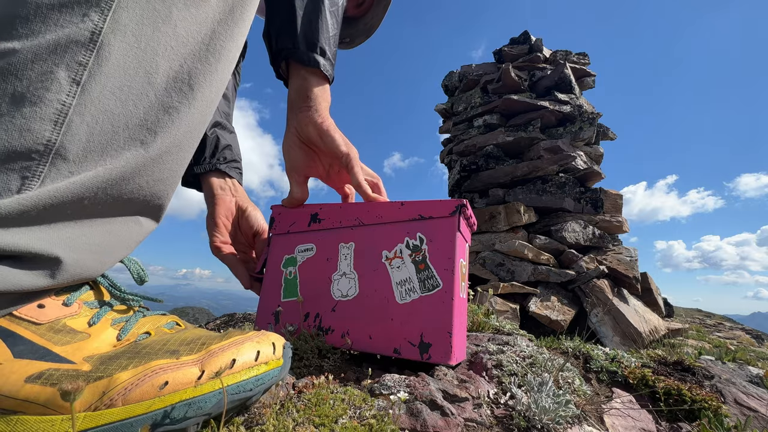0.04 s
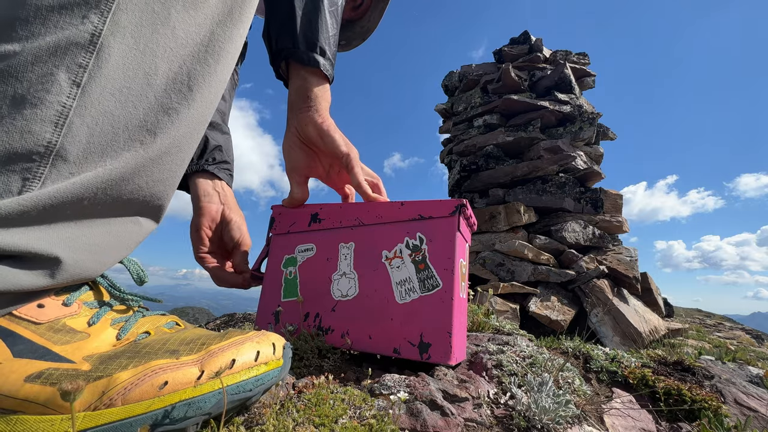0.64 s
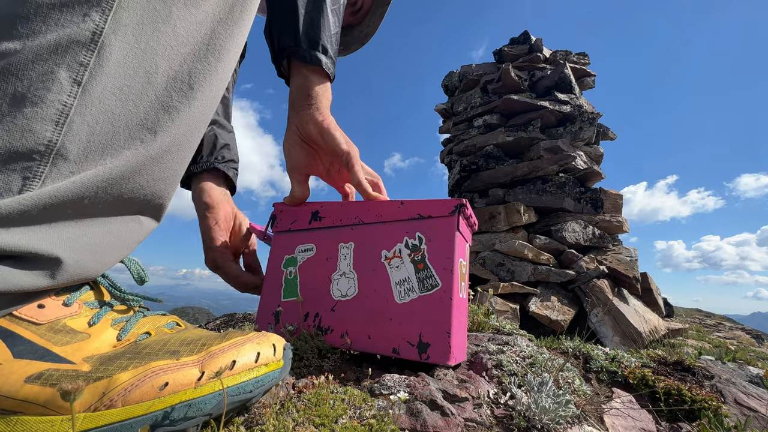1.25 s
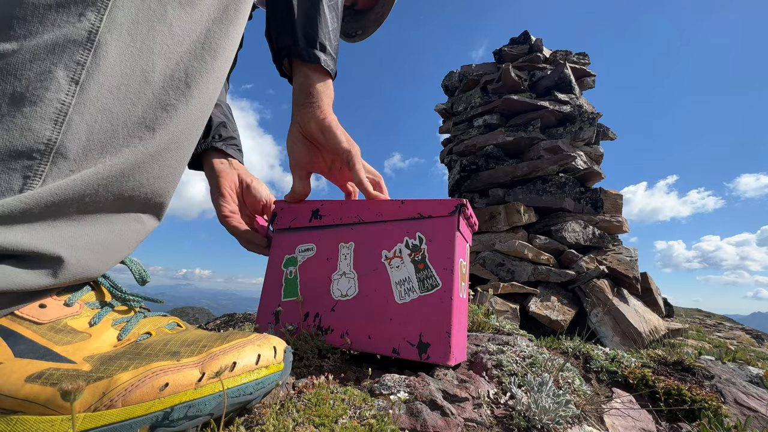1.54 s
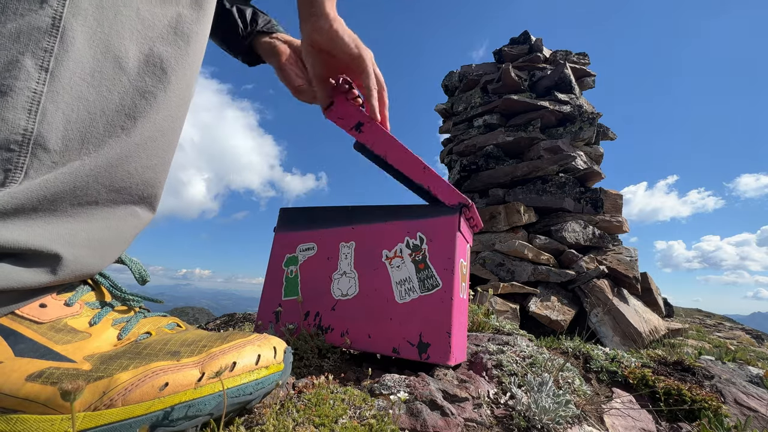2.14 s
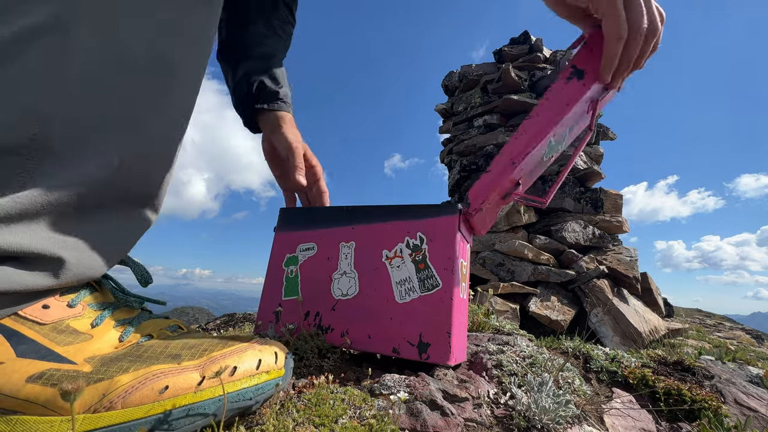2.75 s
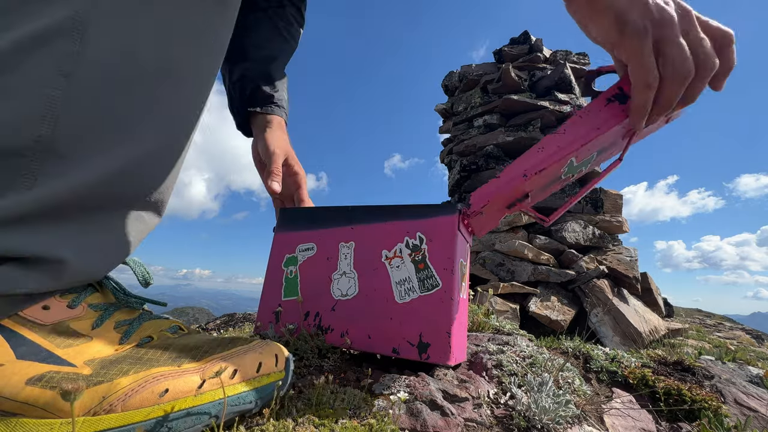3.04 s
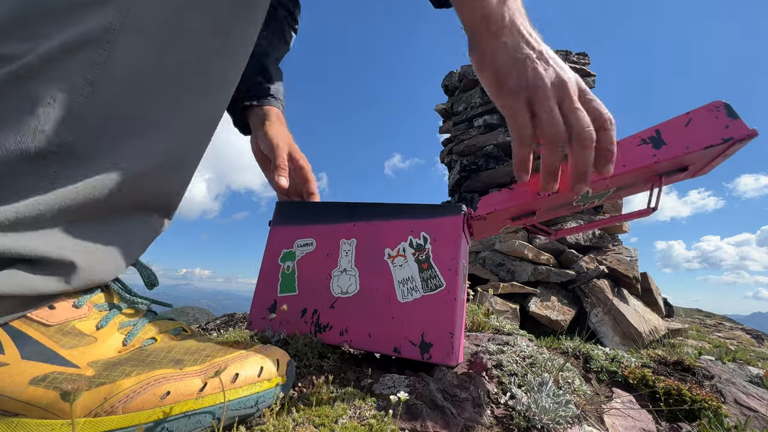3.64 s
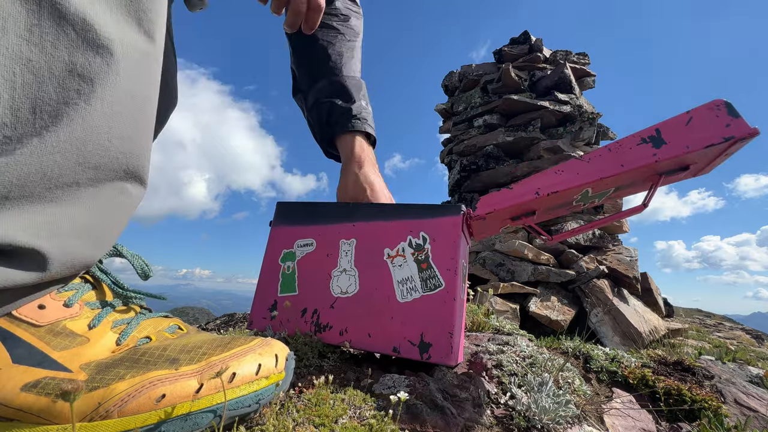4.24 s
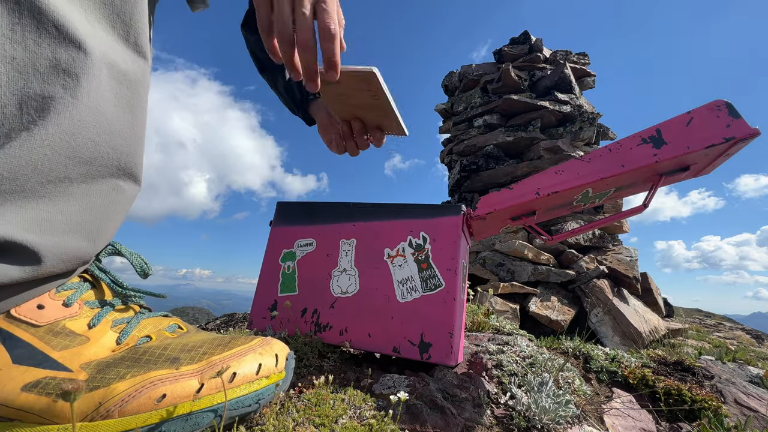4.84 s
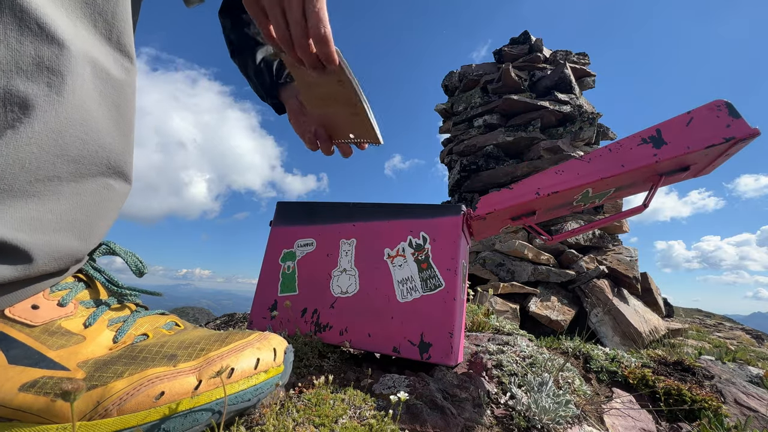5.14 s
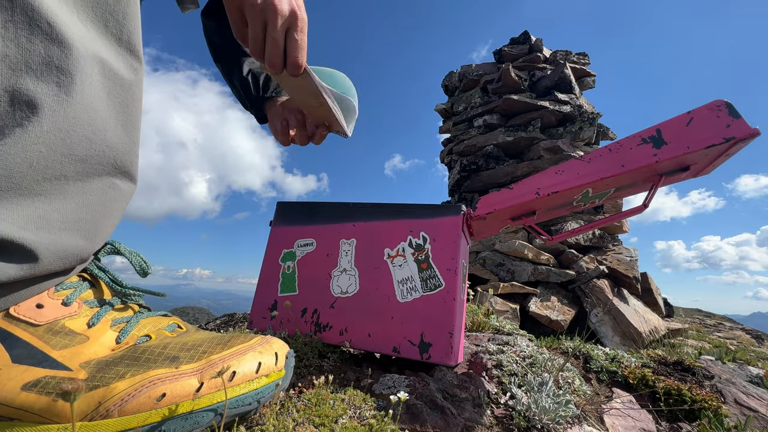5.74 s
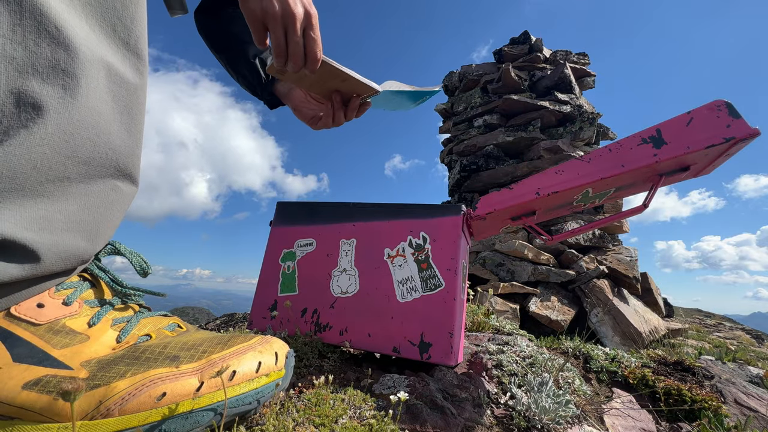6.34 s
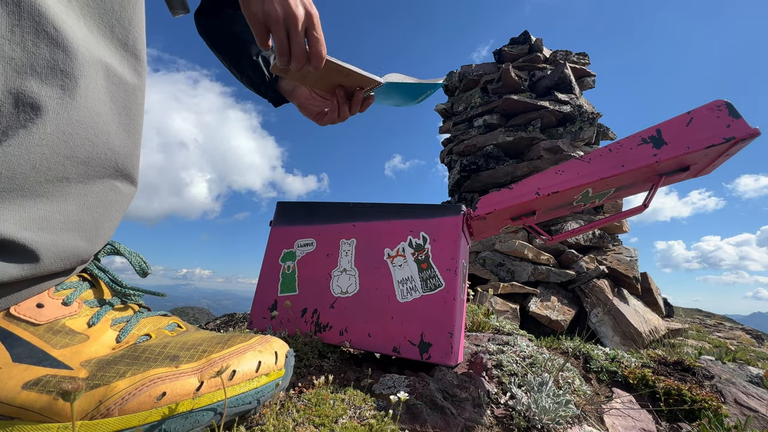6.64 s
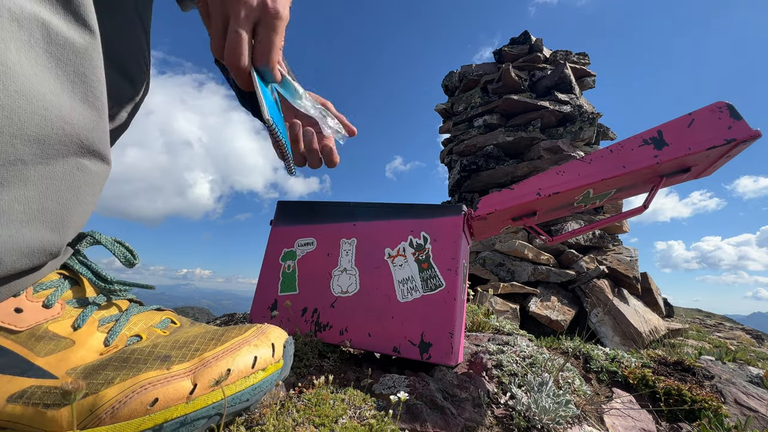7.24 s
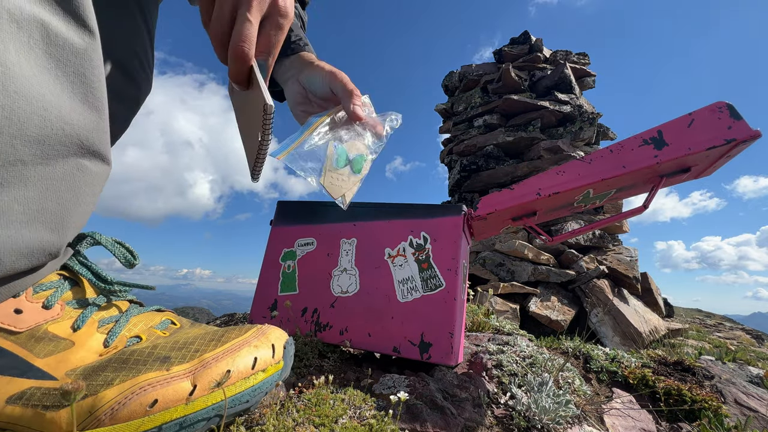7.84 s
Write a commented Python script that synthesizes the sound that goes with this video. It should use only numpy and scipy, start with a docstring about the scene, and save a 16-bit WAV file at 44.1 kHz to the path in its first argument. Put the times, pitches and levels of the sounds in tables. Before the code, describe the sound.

A metal box clanks, unlatches and rattles open close by, then notebook pages flick and a plastic bag crinkles in light wind.

```python
"""A steel ammunition can is opened close to the microphone, on a rocky summit. The latch lever's wire bail
drops against the wall, the latch snaps over, the hinge jerks and the lid rattles onto its stop: each blow is a
short crack, then clear modes ringing over a crowd of lesser plate modes. A notebook knocks the walls on its way
out and is leafed open; a small plastic bag crinkles. Both slide and buckle in grains of noise. Sleeves swish in
tiny slips over a light wind; a low drone swells late."""
import sys
import numpy as np
from scipy import signal
from scipy.fft import rfft, irfft, next_fast_len
from scipy.io import wavfile
from scipy.ndimage import uniform_filter1d

SR = 44100
rng = np.random.default_rng(int(sys.argv[2]) if len(sys.argv) > 2 else 0)


def wav_out(sig):
    """Save sig, one row per channel (or a flat mono array), as 16-bit PCM at SR to the path in sys.argv[1]."""
    wavfile.write(sys.argv[1], SR, np.round(np.clip(np.atleast_2d(sig).T, -1, 1) * 32767).astype(np.int16))


N = 347949
TIME = np.arange(N) / SR


def from_db(db):
    """Decibels to gain."""
    return 10 ** (np.asarray(db) / 20)


def rms_one(x):
    """Scale to unit power."""
    return x / np.sqrt(np.mean(x ** 2) + 1e-20)


def level(rows):
    """Gain curve from (time [s], level [dB]) rows; silent outside them."""
    return from_db(np.interp(TIME, *np.transpose(rows), left=-150, right=-150))


def at_hz(points, hz, axis=1):
    """Read a table column on a log-frequency axis."""
    table = np.array(points)
    return np.interp(np.log(np.maximum(hz, 1)), np.log(table[:, 0]), table[:, axis])


def add(out, start_s, sound):
    """Mix a sound in from start_s on."""
    start = max(0, round(start_s * SR))
    out[..., start:start + sound.shape[-1]] += sound[..., :N - start]


def fade(t, t60_s):
    """Exponential decay, 60 dB in t60_s."""
    return np.exp(-np.log(1000) * t / max(t60_s, 1e-3))


def drift(per_s):
    """Smooth random curve, unit RMS."""
    knots = rng.standard_normal(2000)
    return rms_one(np.interp(TIME * per_s, np.arange(len(knots)), knots))


def strokes(rows):
    """Gain curve of hand strokes: each swells and dies with its speed, in a near-Gaussian bell."""
    power = sum(from_db(db) ** 2 * np.exp(-2 * np.abs(2 * (TIME - centre_s) / length_s) ** 1.9)
                for centre_s, length_s, db in rows)
    return np.sqrt(power + 1e-16)


def grains(per_s, spread_db, t60_s):
    """Power envelope of tiny slips or buckles of unequal size; mean near 1."""
    sizes = from_db(spread_db * np.minimum(rng.exponential(1, N), 4)) ** 2
    impulses = sizes * (rng.random(N) < per_s / SR)
    power = signal.lfilter([1], [1, -fade(2 / SR, t60_s)], impulses + 1e-12)
    return power / (uniform_filter1d(power, SR // 8) + 1e-9)


# Microphone port pair: (frequency [Hz], coherence [0-1], left lead [rad])
MIC_PORTS = [(40, .05, 0), (70, .25, .1), (140, .9, .2), (300, .93, .45), (550, .92, .63), (1000, .7, 1.05),
             (2000, .45, 1.25), (4000, .55, .4), (8500, .5, 2.2), (12500, .87, .75), (16000, .7, 1)]

def noise(spectrum, size=N, band_hz=(10, 20000)):
    """Coloured noise at the two ports, not normalised."""
    length = next_fast_len(size, True)
    hz = np.arange(length // 2 + 1) * SR / length + 1e-3
    left, other = rfft(rng.standard_normal((2, length)))
    coherence = np.clip(at_hz(MIC_PORTS, hz), 0, .99)
    lag = np.exp(-1j * at_hz(MIC_PORTS, hz, axis=2))
    right = (coherence * left + np.sqrt(1 - coherence ** 2) * other) * lag
    passband = 1 / np.sqrt((1 + (band_hz[0] / hz) ** 12) * (1 + (hz / band_hz[1]) ** 12))
    return irfft(np.array([left, right]) * passband * from_db(at_hz(spectrum, hz)), length)[:, :size]


# Buffet, hiss and drone spectra: (frequency [Hz], density [dB])
WIND_SPECTRUM = [(15, -56), (25, -26), (57, -1.5), (102, -5.5), (146, -8.5), (220, -11), (305, -16),
                 (344, -17), (394, -16), (460, -23.5), (555, -37.5), (1500, -44.5), (1950, -77.5),
                 (3300, -120)]
AIR_SPECTRUM = [(470, -26.5), (800, -8), (1750, -5), (7620, -10), (8330, -2.5), (11000, -13.5), (13600, -5),
                (16500, -28.5)]
DRONE_SPECTRUM = [(60, -24), (110, -4), (145, 2), (180, 0.5), (230, -17.5), (400, -58)]
# Buffet and drone envelopes: (time [s], relative level [dB])
WIND_GUSTS = [(0, -54), (2.3, -52), (4.7, -53.5), (5.6, -53), (6.3, -54), (7.1, -62), (7.4, -56),
              (7.89, -55.5)]
DRONE_SWELL = [(6.3, -71), (6.7, -59.5), (7.13, -63.5), (7.19, -48), (7.35, -55), (7.89, -51)]

def wind(flutter_db=0.98):
    """Soft buffeting under a faint open-air hiss; a low drone swells and wavers."""
    buffet = rms_one(noise(WIND_SPECTRUM)) * level(WIND_GUSTS) * from_db(flutter_db * drift(14))
    drone = rms_one(noise(DRONE_SPECTRUM)) * level(DRONE_SWELL)
    hiss = rms_one(noise(AIR_SPECTRUM))
    return from_db(-1.5) * buffet + drone + from_db(-81.5) * hiss


def friction(spectrum, gain, per_s, spread_db):
    """Sliding surfaces: a hiss of dense small slips."""
    return rms_one(noise(spectrum)) * gain * np.sqrt(grains(per_s, spread_db, t60_s=0.091))


# Sliding nylon: (frequency [Hz], density [dB])
NYLON_SPECTRUM = [(410, -42), (700, -15), (1340, -1.5), (2100, -4), (2330, -9), (6280, -3.5), (7560, -8.5),
                  (8980, -1), (10500, -7), (12500, -1.5), (15700, -12.5), (16500, -24.5)]
# Arm strokes: (centre [s], length [s], level [dB])
SLEEVE_STROKES = [(1.15, 0.26, -57.5), (1.47, .1, -71), (1.68, 0.37, -59), (2.08, 0.18, -61),
                  (2.7, .24, -71.5), (2.97, 0.15, -68.5), (3.4, 0.53, -63.5), (3.89, 0.1, -53.5),
                  (3.99, .12, -54), (4.17, 0.14, -62.5), (4.35, 0.13, -54.5), (4.76, 0.26, -58.5)]

def sleeves(busy_s=(0.935, 5.0), idle_db=-75):
    """Nylon swishes with each stroke and stirs faintly between them while the arms work."""
    busy = uniform_filter1d(1.0 * (TIME > busy_s[0]) * (TIME < busy_s[1]), size=SR // 10)
    gain = np.hypot(strokes(SLEEVE_STROKES), from_db(idle_db) * busy)
    return friction(NYLON_SPECTRUM, gain, per_s=1900, spread_db=3.0)


def rustle(spectrum, moves, snaps, per_s, spread_db, smooth_share, snap_db, snap_t60_s):
    """A thin sheet slides and buckles; each buckle has its own colour, a few snap out loudly."""
    out, t = 0, np.arange(SR // 10) / SR
    bands = [noise(spectrum, band_hz=edges) for edges in [(200, 2500), (2500, 7000), (7000, 17000)]]
    shared_grains = grains(per_s, spread_db, t60_s=0.0078)
    effort = strokes(moves)
    for band in bands:
        crackle = .5 * (shared_grains + grains(per_s, spread_db, t60_s=0.0043))
        power = effort ** 2 * (smooth_share + (1 - smooth_share) * crackle)
        for start_s, db in snaps:
            snap = from_db(db + snap_db + rng.normal(0, 1.0)) * fade(t, snap_t60_s)
            add(power, start_s, snap ** 2)
        out = out + band * np.sqrt(power)
    return out / np.std(sum(bands))


# Plastic film: (frequency [Hz], density [dB])
PLASTIC_SPECTRUM = [(240, -3), (400, -4), (1150, -13.5), (2180, -2), (2980, -13), (4680, -8.5), (5300, -11),
                    (6390, -8), (8990, -4), (10800, -10.5), (14100, -9.5), (15700, -16.5), (16500, -36)]
# Squeezes: (centre [s], length [s], relative level [dB])
BAG_SQUEEZES = [(7.207, 0.078, -55), (7.28, 0.15, -63.5), (7.41, .05, -47), (7.468, 0.084, -40.5),
                (7.58, 0.19, -54.5), (7.759, 0.36, -69.5), (7.822, .022, -50)]
# Loud buckles: (time [s], relative peak [dB])
BAG_BUCKLES = [(7.1076, -60), (7.1672, -40.5), (7.186, -35.5), (7.2212, -33.5), (7.2807, -38.5),
               (7.3954, -35.5), (7.6348, -31), (7.6606, -42.5), (7.7499, -41.5), (7.816, -47)]

def bag():
    """Squeezed plastic crinkles densely, with short snaps."""
    return from_db(1.9) * rustle(PLASTIC_SPECTRUM, BAG_SQUEEZES, BAG_BUCKLES, per_s=700, spread_db=4,
                                 smooth_share=.25, snap_db=-6, snap_t60_s=.014)


# Paper: (frequency [Hz], density [dB])
PAPER_SPECTRUM = [(470, -2), (800, -13.5), (1890, 2.5), (4650, -5.5), (5410, -4.5), (6710, -4.5),
                  (7720, -2.5), (9570, -1.5), (10900, -5), (14200, -0.5), (16500, -20)]
# Sliding pages: (centre [s], length [s], relative level [dB])
PAGE_SLIDES = [(5.391, .18, -55.5), (5.399, 0.029, -50), (5.58, 0.24, -68), (5.719, 0.011, -43.5),
               (5.747, 0.083, -55), (5.95, 0.024, -46), (6.0, 0.12, -57.5), (6.22, 0.13, -79),
               (6.601, 0.072, -80), (6.8, 0.11, -77.5)]
# Page flicks: (time [s], relative peak [dB])
PAGE_SNAPS = [(5.369, -40.5), (5.3926, -27), (5.586, -45), (5.7138, -48), (5.7344, -30), (5.767, -33.5),
              (5.938, -54), (5.949, -33), (5.9864, -44), (6.0057, -39), (6.2297, -48.5), (6.567, -65.5),
              (6.622, -60.5)]

def notebook():
    """Leafed pages slide and flick."""
    return from_db(-3.0) * rustle(PAPER_SPECTRUM, PAGE_SLIDES, PAGE_SNAPS, per_s=300, spread_db=3.5,
                                  smooth_share=.3, snap_db=-7, snap_t60_s=.03)


# Pushes on the can: (centre [s], length [s], level [dB])
ROCKING_STROKES = [(1.17, .22, -46), (3.05, .7, -49)]

def rocking(flutter_db=1.5):
    """The can rocks on the ground: a rumble as dull as the wind."""
    return rms_one(noise(WIND_SPECTRUM)) * strokes(ROCKING_STROKES) * from_db(flutter_db * drift(36))


# Rubbed steel: (frequency [Hz], density [dB])
RUB_SPECTRUM = [(150, -30), (250, -6.5), (507, -7), (710, -10.5), (1020, -21), (1840, -19), (2040, -24.5),
                (2370, -25), (4000, -36.5), (5200, -69.5), (8800, -120)]
# Rubs: (centre [s], length [s], level [dB])
RUB_STROKES = [(1.1, 0.31, -49), (1.85, 0.73, -57), (2.49, 0.55, -52), (3.07, 0.23, -53.5),
               (3.29, 0.39, -41), (3.47, 0.24, -42), (3.66, 0.32, -56), (4.22, 0.63, -57.5)]

def rubbing():
    """Steel or a hand slides on the can."""
    return friction(RUB_SPECTRUM, strokes(RUB_STROKES), per_s=160, spread_db=3.5)


def panned(db, pan_db):
    """Stereo gains, left pan_db above right."""
    return from_db(db + pan_db * np.array([[.5], [-.5]]))


def mode(t, hz, db, t60_s, pan_db):
    """One ringing mode; its strength varies at random with where the blow lands."""
    port_lag = np.array([[0], [at_hz(MIC_PORTS, hz, axis=2)]])
    phase = 2 * np.pi * (hz * t + rng.random()) - port_lag
    return panned(db + rng.normal(0, 1), pan_db) * np.sin(phase) * fade(t, t60_s)


def bunched(x, spacing_hz=90, spread_db=3.5):
    """A sheet's lesser modes bunch into narrow peaks and gaps."""
    length = next_fast_len(x.shape[-1], True)
    position = np.arange(length // 2 + 1) * SR / length / spacing_hz
    heights_db = rng.normal(0, spread_db, int(position[-1]) + 2)
    ripple = from_db(np.interp(position, np.arange(len(heights_db)), heights_db))
    return irfft(rfft(x, length) * ripple, length)


# Steel sheet registers (thud, body, clang, tick): (low edge [Hz], high edge [Hz])
SHEET_REGISTERS = [(50, 300), (300, 1100), (1100, 6000), (6000, 17000)]
# Decay per register: (base t60 [s], crack over ring [dB])
REGISTER_DECAY = [(0.089, -6), (0.13, -3), (0.12, 8), (0.078, 5.5)]
CRACK_T60_S = 0.0095
THUD_SLOPE, USUAL_BLOW_DB = 0.55, -35   # the ground holds the can, so the thud grows less than the body
CONTACT_SLOPE = -0.52   # dB of contact time per dB of hardness

def blows(rows, sheet, modes, thud_db, clang_db, clang_slope, contact_s, choke_t60_s, pan_db, ring_scale):
    """Struck steel: a crack, then modes over a noise crowd. Hardness is tick level over body level."""
    out, t = np.zeros((2, N)), np.arange(SR // 2) / SR
    gaps_s = np.diff([row[0] for row in rows], append=N / SR)
    for k, (low_hz, high_hz) in enumerate(SHEET_REGISTERS):
        crowd_t60_s, crack_db = REGISTER_DECAY[k]
        crowd = noise(sheet, size=N + len(t), band_hz=(low_hz, high_hz))
        crowd = rms_one(bunched(crowd) if k > 1 else crowd)
        for (start_s, body_db, hardness_db, ring_length), gap_s in zip(rows, gaps_s):
            levels_db = [thud_db + THUD_SLOPE * (body_db - USUAL_BLOW_DB), body_db,
                         body_db + clang_db + clang_slope * hardness_db, body_db + hardness_db]
            start = max(0, round(start_s * SR))
            sustain = ring_length * ring_scale[k]   # a gripping hand shortens the ring
            touch_s = contact_s * from_db(CONTACT_SLOPE * hardness_db)
            crack = from_db(crack_db) * fade(t, CRACK_T60_S + 2 * touch_s)
            ring = crowd[:, start:start + len(t)] * (fade(t, crowd_t60_s * sustain) + crack)
            ring += sum(mode(t, hz, db, t60_s * sustain, pan)
                        for hz, db, t60_s, pan in modes if low_hz <= hz < high_hz)
            ring *= 1 - np.exp(-(t / (touch_s + 0.83 / low_hz)) ** 2)   # low modes build up slower
            ring *= fade(np.maximum(t - gap_s, 0), choke_t60_s)   # the next contact damps the ring
            ring /= np.sqrt(np.mean(ring ** 2) * len(t) / (SR / 50))   # energy of 20 ms at unit power
            add(out, start_s, ring * panned(levels_db[k], pan_db[k]))
    return out


# Inside knocks: (time [s], body level [dB], hardness [dB], ring length [ratio])
INNER_BLOWS = [(4.1815, -38, -28, 0.26), (4.3655, -27, 0, 0.86)]
# Lesser plate modes: (frequency [Hz], density [dB])
INNER_CROWD = [(100, -25), (250, -20), (400, -5.5), (600, 1), (750, -2), (1200, 7), (1800, 5.5),
               (2800, 1.5), (5000, -8.5), (8000, -22.5), (12000, -23), (17000, -39)]
# Open can: (frequency [Hz], level over crowd [dB], base t60 [s], pan [dB])
OPEN_CAN_MODES = [(390, -5, .2, 2), (525, -5, .15, 2), (578, 6, .16, 1), (850, -4, .11, 8),
                  (925, -7, .2, 2), (1087, -9, .18, 0), (1240, -3, .14, 4), (1653, -11, .17, 0),
                  (2062, -10, .16, 0), (2126, -16, .2, 0), (2234, -15, .2, 0), (2616, -11, .16, 0),
                  (2794, -2, .1, -3), (3036, -9, .09, -2), (3967, -9, .08, 3)]

def contents():
    """The notebook knocks the walls of the open can on its way out."""
    return blows(INNER_BLOWS, INNER_CROWD, OPEN_CAN_MODES,
                 thud_db=-45.5, clang_db=-0.1, clang_slope=0.54, contact_s=0.0029, choke_t60_s=1.5,
                 pan_db=[0, 1, 0, 1], ring_scale=[1.6, 2.22, 2.05, 1.7])


# Bail drops: (time [s], body level [dB], hardness [dB], ring length [ratio])
BAIL_BLOWS = [(0, -36, -15.5, 0.62), (0.1425, -17, -11.5, 1), (0.401, -84, 17, 0.33),
              (0.5905, -25.5, -5.5, 0.71)]
# Lesser wall modes: (frequency [Hz], density [dB])
WALL_CROWD = [(100, -14), (250, -13.5), (400, 0), (650, 3), (900, -0.5), (1300, -4), (1600, -8), (2200, -6),
              (3000, -16.5), (4300, -7), (5800, -9), (9500, -17.5), (13500, -11.5), (17000, -19.5)]
# Shut can: (frequency [Hz], level over crowd [dB], base t60 [s], pan [dB])
SHUT_CAN_MODES = [(392, -3, .14, -2), (530, 6, .16, 0), (622, -3, .09, -3), (660, -2, .07, -6),
                  (817, 7, .15, 2), (905, -4, .13, 6), (937, 0, .22, 14), (1077, -8, .11, 8),
                  (1260, 0, .09, 0), (1335, -8, .19, 2), (1696, -11, .12, 0), (1814, -11, .1, 0),
                  (2083, -13, .09, 2)]

def bail():
    """The latch lever's wire bail drops against the wall and rings the shut can."""
    return blows(BAIL_BLOWS, WALL_CROWD, SHUT_CAN_MODES,
                 thud_db=-52.5, clang_db=-3.4, clang_slope=0.73, contact_s=.0005, choke_t60_s=.2,
                 pan_db=[-2, 0.5, 2.5, 0], ring_scale=[.43, 1.0, 0.93, 0.94])


# Catch snaps, lever moves: (time [s], body level [dB], hardness [dB], ring length [ratio])
CATCH_BLOWS = [(1.029, -46, -6.5, 0.73), (1.0432, -26.5, 1.5, 0.2)]
LEVER_BLOWS = [(0.945, -51.5, -25, 0.63), (1.066, -31.5, -17.5, 1.56), (1.1585, -20.5, -3.5, 1.11),
               (1.268, -35, -11.5, 0.68), (1.5, -47.5, -21, 1.2), (1.524, -51, -3, 1.9),
               (1.546, -45, -0.5, 1.2), (1.563, -39.5, -3.5, 0.98), (1.799, -47, -6.5, 1.5),
               (1.8245, -45.5, -0.5, 1.04)]
# Lesser plate modes: (frequency [Hz], density [dB])
LATCH_CROWD = [(100, -4.5), (170, -2), (290, -12), (380, -4), (780, -1.5), (1000, -6), (1400, -4.5),
               (2000, -4), (2800, -12), (4400, -6), (5400, -8.5), (10000, -12.5), (13000, -13.5),
               (17000, -25.5)]
# Catch, lever: (frequency [Hz], level over crowd [dB], base t60 [s], pan [dB])
CATCH_MODES = [(530, -2, .1, 0), (620, -2, .09, 0), (765, 3, .1, 1), (2240, -3, .06, -8), (3700, 0, .07, 8),
               (4000, 2, .07, 5), (4400, 7, .07, 5), (4560, 6, .07, 5), (6880, -3, .06, 5),
               (13000, 4, .06, 0)]
LEVER_MODES = [(362, -4, .1, -2), (530, 2, .11, -2), (655, -1, .09, -7), (775, 2, .1, 1), (870, -2, .1, 2),
               (1250, 7, .09, 0), (1540, 5, .08, -2), (1670, -3, .07, 3), (4480, 0, .06, 9)]

def latch():
    """The catch snaps with brief contacts; the lever knocks over with longer ones."""
    catch = blows(CATCH_BLOWS, LATCH_CROWD, CATCH_MODES,
                  thud_db=-41.5, clang_db=1.0, clang_slope=.6, contact_s=0.00041, choke_t60_s=.2,
                  pan_db=[0, 0, 0, 1], ring_scale=[1.4, 1.9, 3.9, 2.0])
    lever = blows(LEVER_BLOWS, LATCH_CROWD, LEVER_MODES,
                  thud_db=-42, clang_db=2.0, clang_slope=.8, contact_s=0.0033, choke_t60_s=.2,
                  pan_db=[0, 0, 1, 1], ring_scale=[1.0, .94, 0.75, 1.0])
    return catch + lever


# Hinge jerks: (time [s], body level [dB], hardness [dB], ring length [ratio])
HINGE_BLOWS = [(1.975, -45.5, -49, 0.88), (2.09, -50, -8, .57), (2.203, -45, -23.5, .46),
               (2.3376, -50, 12, .55), (2.348, -38.5, 2.5, 1.66), (2.382, -44, -11.5, .8),
               (2.476, -46, -7, .56), (2.488, -48, -5, 1), (2.534, -51, 12, 1.4), (2.5574, -30.5, 13, .92),
               (2.592, -34, 1.5, .73)]
# Lesser plate modes: (frequency [Hz], density [dB])
HINGE_CROWD = [(100, -0.5), (250, -8), (380, 6), (800, 1), (1000, -5), (1700, -0.5), (2300, -2.5),
               (4700, -6.5), (5600, -6.5), (7000, -3.5), (9500, 1), (13000, -4.5), (15000, -9),
               (17000, -19)]
# Hinge: (frequency [Hz], level over crowd [dB], base t60 [s], pan [dB])
HINGE_MODES = [(386, 4, .25, 0), (582, 0, .15, 2), (780, 0, .15, 2), (904, -4, .16, 0), (1710, -3, .09, 0),
               (2702, -10, .11, 0), (4300, -6, .12, -4), (4950, -4, .09, -5), (6790, 1, .11, 2),
               (6865, -3, .1, 0), (7100, -4, .08, -4), (8470, -5, .08, -6), (8760, -4, .09, -3),
               (10150, -4, .08, 0), (13100, -8, .06, 0), (14710, -9, .09, 0)]

def hinge():
    """The hinge turns in bright jerks, each choking the ring of the last."""
    return blows(HINGE_BLOWS, HINGE_CROWD, HINGE_MODES,
                 thud_db=-45.5, clang_db=-1.5, clang_slope=.52, contact_s=0.0039, choke_t60_s=0.066,
                 pan_db=[1, .5, -2, -1.4], ring_scale=[0.54, 0.81, 0.91, 1.0])


# Lid bumps: (time [s], body level [dB], hardness [dB], ring length [ratio])
LID_BLOWS = [(2.999, -51.5, -15, 0.37), (3.0645, -53, -18, 0.49), (3.1403, -29, -0.5, 0.74),
             (3.2026, -37, -11.5, 2), (3.2455, -45, 17.5, 0.16), (3.2505, -16.5, -17, .4),
             (3.276, -29.5, -16, .8), (3.299, -53.5, 9.5, 0.67), (3.341, -36, -20, 1.5),
             (3.3675, -23.5, -13, 0.99), (3.3802, -39, 4, 1.15), (3.411, -32.5, -12, 0.67),
             (3.428, -29, -12, 1.2), (3.539, -38, -16, 0.56), (3.5788, -36.5, -10, 0.32),
             (3.6745, -50.5, -16, 0.5)]
# Lesser lid modes: (frequency [Hz], density [dB])
LID_CROWD = [(70, 4.5), (200, -20.5), (300, -1.5), (410, 1.5), (490, 1.5), (600, 1), (790, -15.5),
             (950, -12), (1700, -5), (4200, -10), (5400, -13), (6500, -15), (11500, -14.5), (17000, -34.5)]
# Open lid: (frequency [Hz], level over crowd [dB], base t60 [s], pan [dB])
LID_MODES = [(385, -3, .13, -1), (425, -3, .11, -1), (580, 1, .14, 1), (614, 1, .3, 1), (745, -11, .28, 0),
             (790, -2, .17, -1), (1550, -7, .17, -6), (1760, -8, .21, -3), (2116, -10, .14, -7),
             (3650, -9, .07, -3), (4320, -5, .08, 0), (6780, -7, .1, 0), (8800, -3, .06, -9),
             (11400, 0, .05, 0)]

def lid():
    """The lid rattles onto its stop, its rings overlapping."""
    return blows(LID_BLOWS, LID_CROWD, LID_MODES,
                 thud_db=-54, clang_db=-0.5, clang_slope=0.93, contact_s=0.001, choke_t60_s=.9,
                 pan_db=[0.0, 0.5, -3.5, -0.5], ring_scale=[0.77, 1.0, 1.21, 1.65])


def scene():
    """The can, the hands and what they take out, in the open air."""
    handling = rubbing() + rocking() + sleeves() + notebook() + bag()
    can = bail() + latch() + hinge() + lid() + contents()
    return can + handling + wind()


def treble_dip(x, hz, width_hz, depth):
    """A narrow notch in the treble."""
    b, a = signal.iirnotch(hz, hz / width_hz, fs=SR)
    return x + depth * (signal.lfilter(b, a, x) - x)


def record(dry):
    """The treble dips in three narrow notches; a steep low-pass cuts the top."""
    heard = treble_dip(dry, hz=5400, width_hz=240, depth=0.69)
    heard = treble_dip(heard, hz=7700, width_hz=370, depth=1.0)
    heard = treble_dip(heard, hz=10780, width_hz=1400, depth=0.9)
    return signal.sosfilt(signal.ellip(10, .2, 90, 16400, fs=SR, output="sos"), heard)


dry = scene()
out = record(dry)
wav_out(out)
```